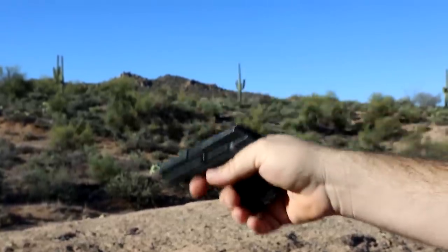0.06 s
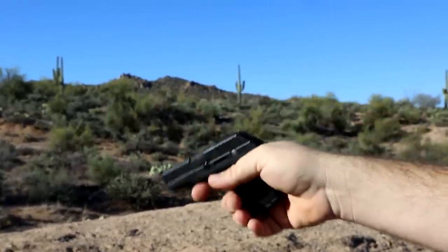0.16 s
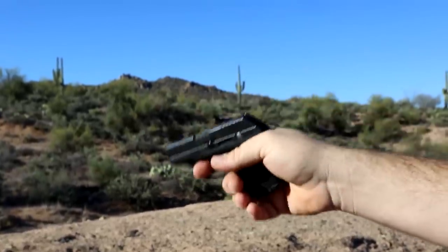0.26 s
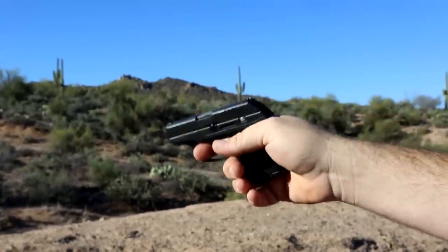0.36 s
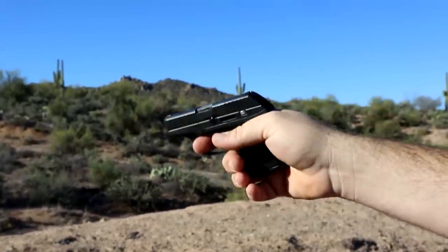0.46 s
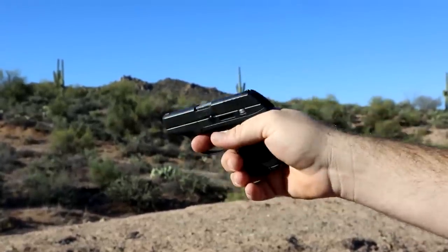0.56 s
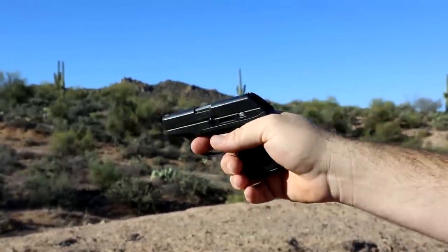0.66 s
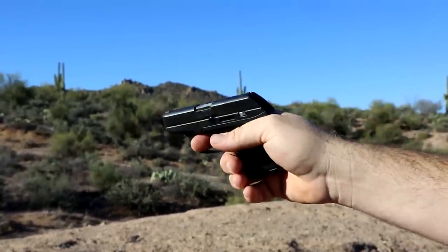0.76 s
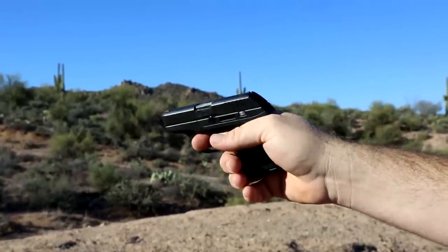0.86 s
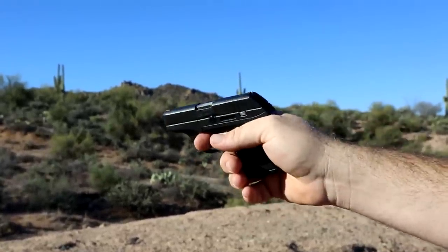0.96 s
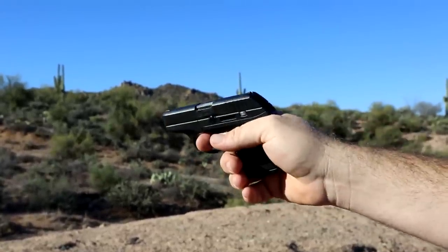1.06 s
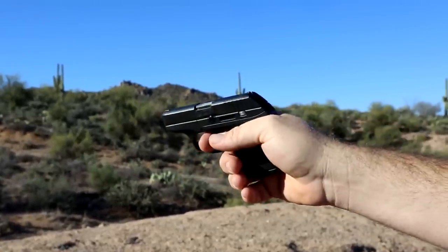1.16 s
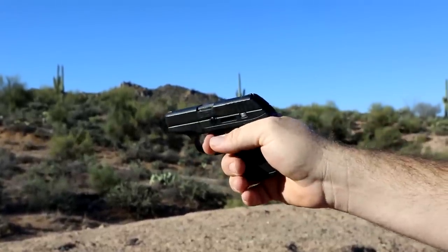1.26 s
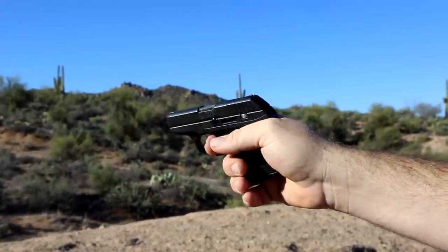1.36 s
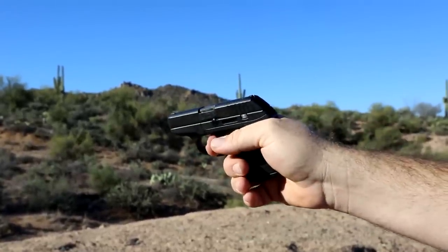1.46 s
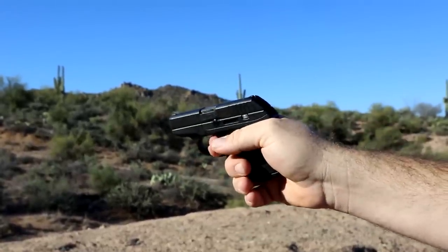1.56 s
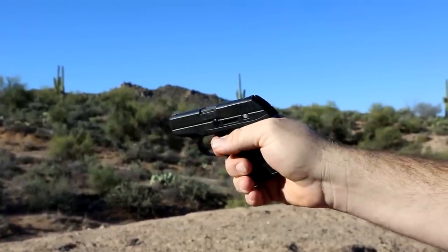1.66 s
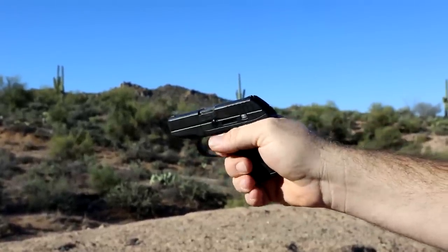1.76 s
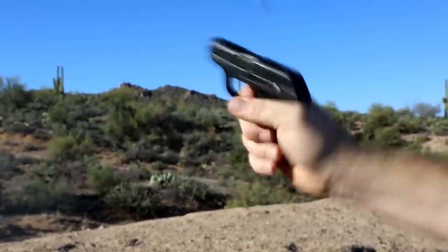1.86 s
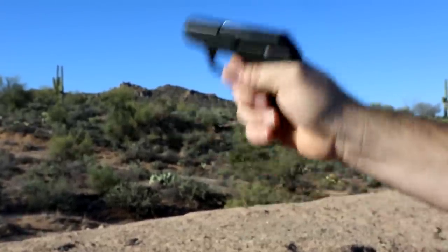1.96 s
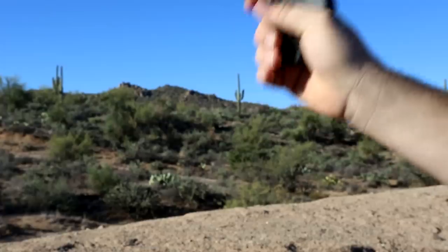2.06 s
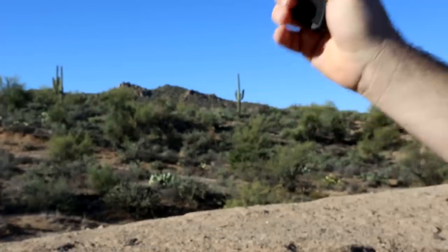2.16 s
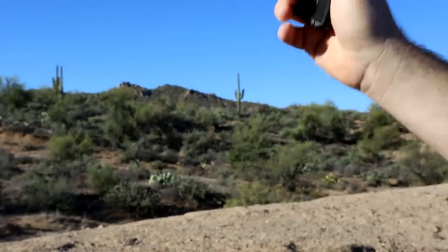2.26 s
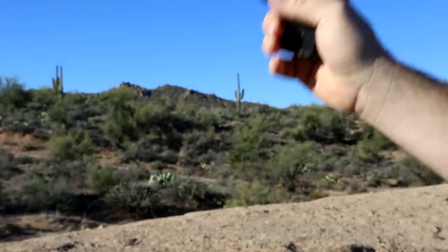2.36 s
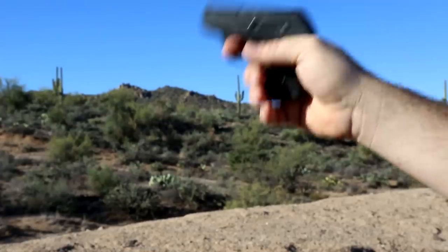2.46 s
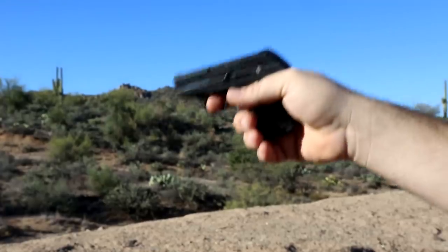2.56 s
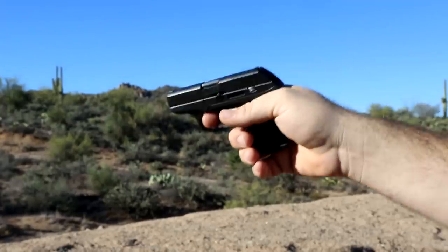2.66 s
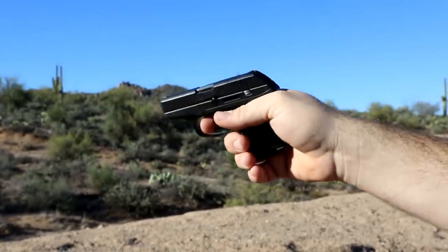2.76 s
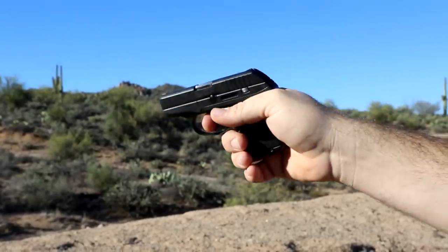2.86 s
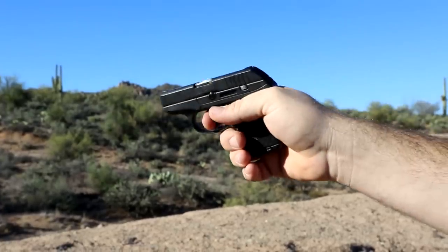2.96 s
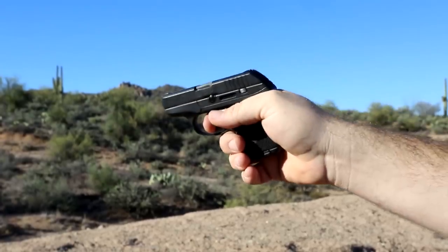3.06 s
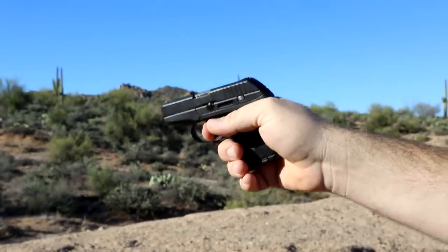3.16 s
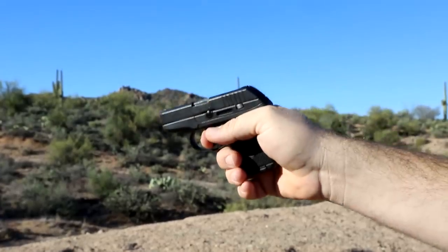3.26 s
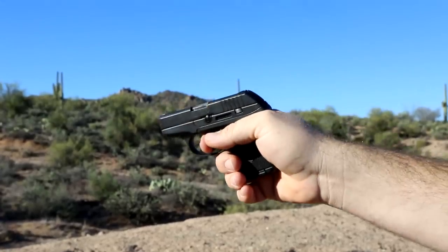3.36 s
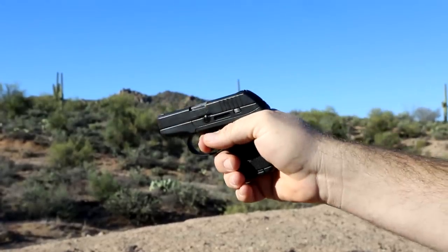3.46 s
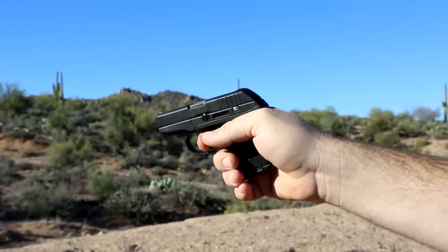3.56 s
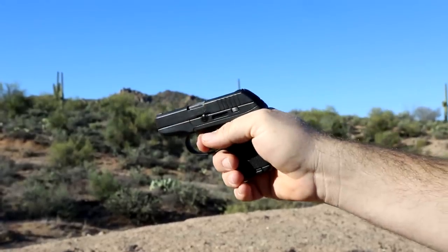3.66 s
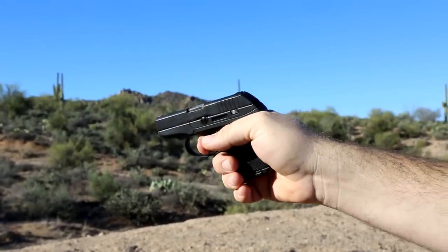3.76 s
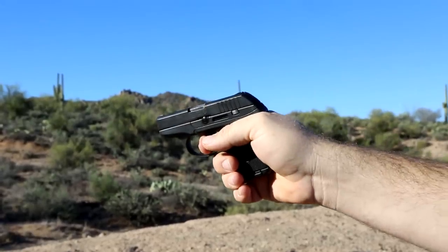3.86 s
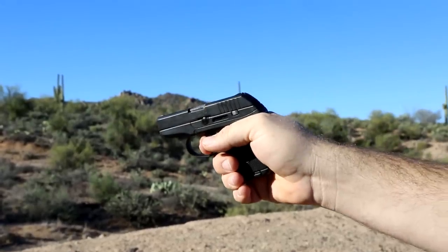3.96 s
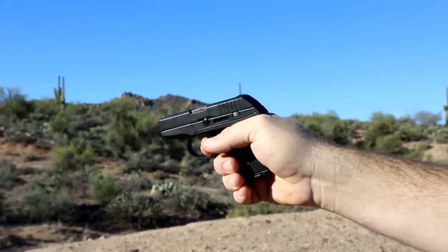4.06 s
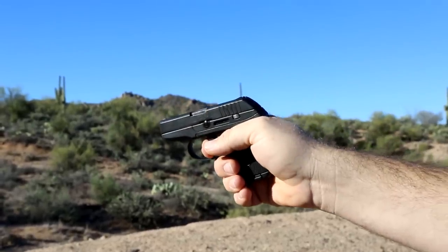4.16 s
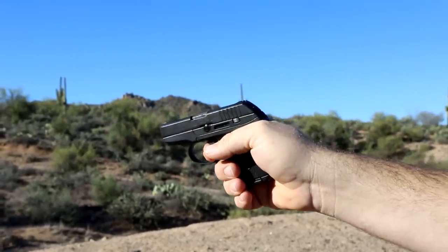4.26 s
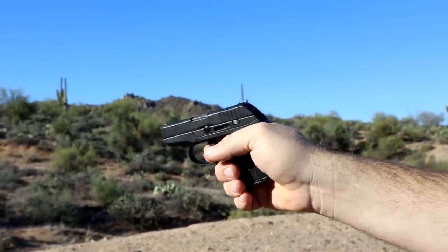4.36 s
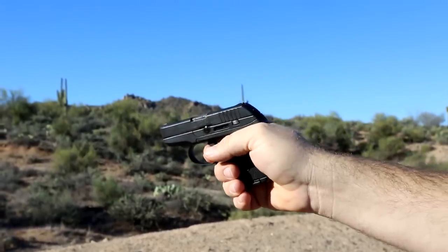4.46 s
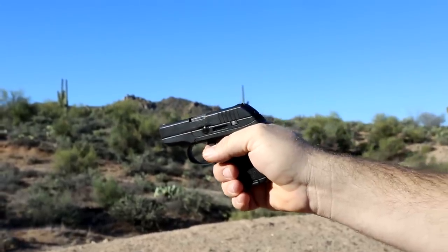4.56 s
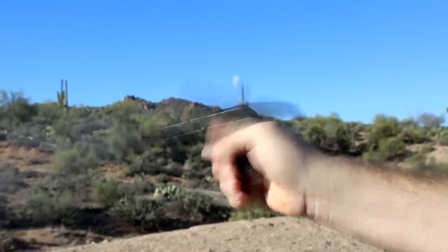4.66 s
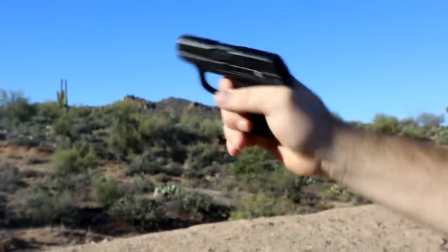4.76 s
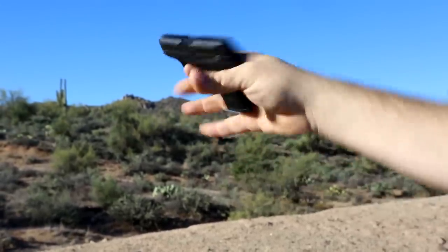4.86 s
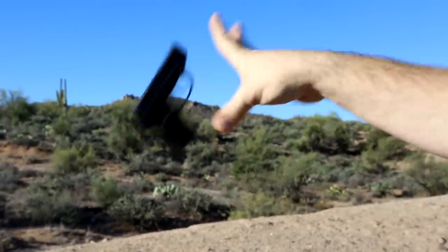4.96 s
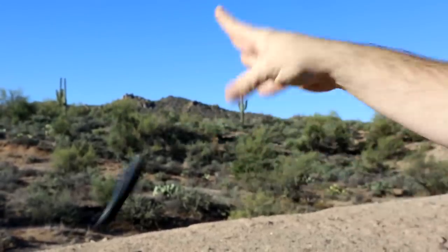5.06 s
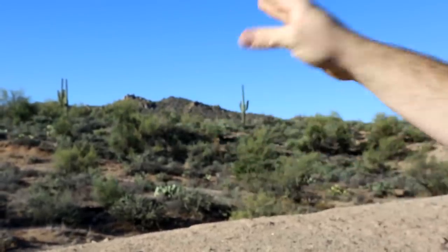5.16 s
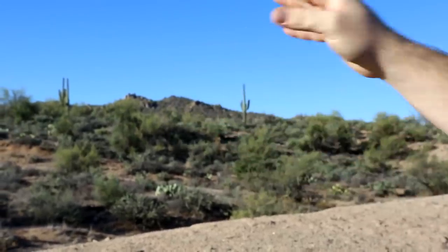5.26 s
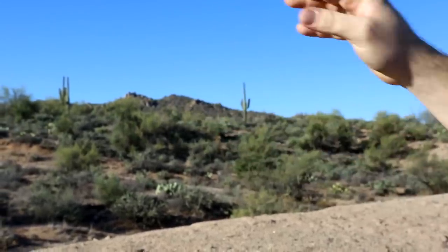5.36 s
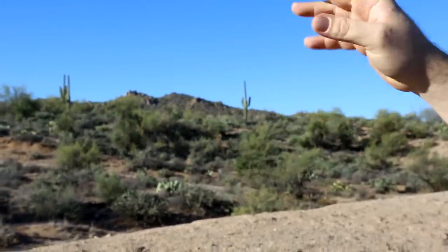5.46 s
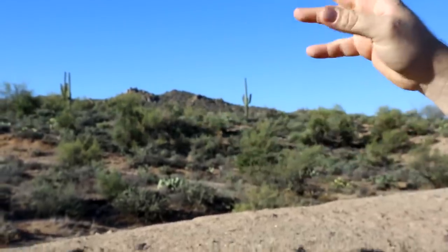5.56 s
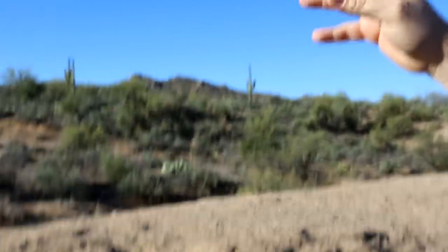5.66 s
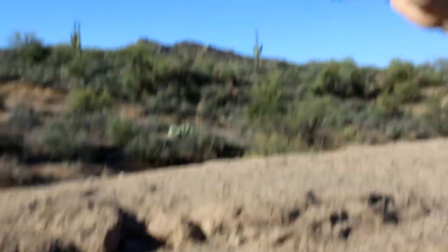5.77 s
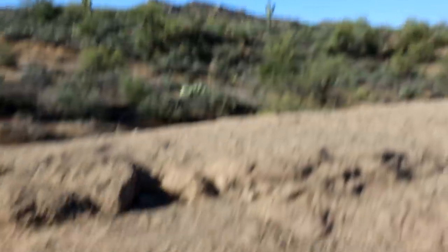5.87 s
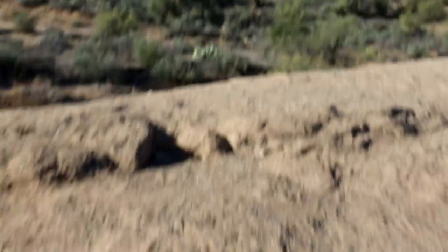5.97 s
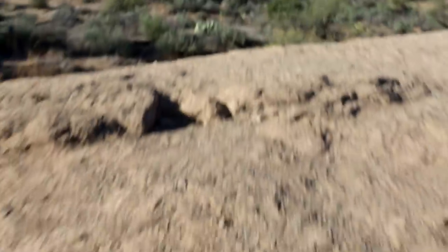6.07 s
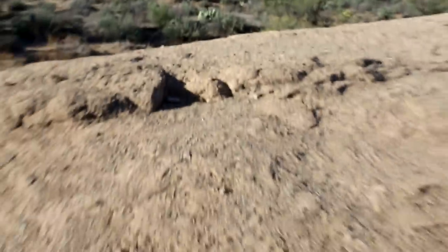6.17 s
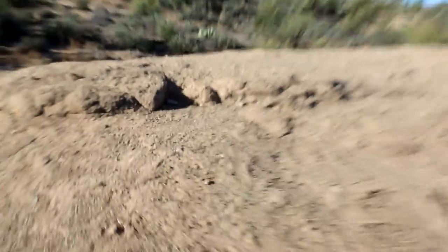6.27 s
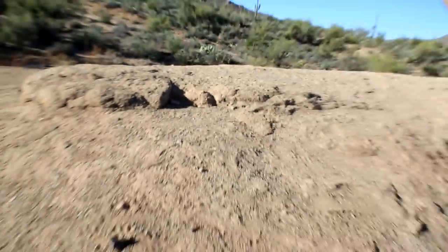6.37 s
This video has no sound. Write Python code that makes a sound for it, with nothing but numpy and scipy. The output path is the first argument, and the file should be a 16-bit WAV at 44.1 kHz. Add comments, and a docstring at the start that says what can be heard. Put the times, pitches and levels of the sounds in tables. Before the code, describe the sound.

The echo of an earlier shot fades over open desert. After a few faint grip clicks, a small pistol fires close to the microphone, a sharp, overloaded crack with a short echo off the rocks. A second shot follows about three seconds later. The pistol then hits stone with a hard metallic clack and a brief clatter, and a hand rubs and knocks the microphone. Faint wind lies underneath.

```python
"""A small pistol fires twice in open desert, close to a camera; an earlier shot's echo rolls at the start.
Each blast returns from the same brush and rock faces, duller the farther it has travelled.
The pistol is then dropped, strikes hard by the microphone and clatters; the hand rubs the camera as it
swings down. The camera overloads on each bang, ducks its gain and slowly lets the faint wind back in."""
import sys
import numpy as np
from scipy import signal
from scipy.fft import rfft, irfft, next_fast_len
from scipy.io import wavfile
from scipy.ndimage import uniform_filter1d, minimum_filter1d, map_coordinates

SR = 44100
rng = np.random.default_rng(int(sys.argv[2]) if len(sys.argv) > 2 else 0)


def master_out(mix):
    """Clip the mix to full scale and print it as 16-bit PCM to the path in sys.argv[1]."""
    frames = np.transpose(np.atleast_2d(mix))
    ceiling = np.clip(frames, -1, 1)
    pcm = np.round(ceiling * 32767).astype(np.int16)
    wavfile.write(sys.argv[1], SR, pcm)


N = 283298
TIME = np.arange(N) / SR
NEAR_ATTACK_S, NEAR_END_S = 0.002, 0.027  # answer of the nearest ground and boulders

# trigger pulls: t/s, level/dB
SHOTS = [(-.335, -0.2), (1.9688, 0.5), (4.8120, 0.5)]
# spectrum of small clicks: f/Hz, level/dB
CLICK_SPECTRUM = [(500, 6), (2000, -7.5), (5500, 0), (11000, -1), (15500, -7.5)]


def gunshots():
    """Each shot has its own crack; the land answers all alike."""
    out, answer = np.zeros(N), boom() + land_echo()
    for s, db in SHOTS:
        add(out, s, amp(db) * (crack() + answer))
    return out


def crack(spray_db=4.5):
    """Muzzle blast, its ground bounce and a bright spray off the nearest stones."""
    # blast and bounce: delay/s, length/s, level/dB
    pulses = [(.0004, .0008, 19), (.0023, 0.0021, 26)]
    # crack spectrum: f/Hz, level/dB
    spectrum = [(100, -18.5), (700, -4), (2000, -5), (4000, -4), (6000, -5), (7500, -5), (10500, -5),
                (15500, -9)]
    blast = sum(amp(db) * swell(TIME, s, s + length, attack_s=0.0004, fall_db_per_s=13000)
                for s, length, db in pulses)
    spray = swell(TIME, NEAR_ATTACK_S, NEAR_END_S, NEAR_ATTACK_S, fall_db_per_s=1000, sag_db_per_s=201)
    return np.hypot(blast, amp(spray_db) * spray) * noise(lambda hz: colour(spectrum, hz))


def boom(gain_db=12.5, wash_db=-3.5, ring_db=15.5, struck_s=0.0035):
    """Low part of the blast, ringing briefly among the nearest rocks."""
    # resonances: f/Hz, level/dB
    modes = [(545, -31), (900, -30), (1208, -30), (1357, -30.5), (1655, -30.5), (2285, -39), (2404, -42.5),
             (2626, -37.5), (2832, -37.5), (3219, -40)]
    # wash spectrum: f/Hz, level/dB
    spectrum = [(40, -24), (110, -8.5), (330, -0.5), (450, -3.5), (800, -4.5), (1200, 1), (2000, -6),
                (2800, -6.5), (4500, -13.5), (9000, -26), (16000, -42)]
    t = TIME[:SR // 4]
    ring = sum(amp(db) * np.sqrt(2) * np.sin(2 * np.pi * hz * (t - struck_s)) for hz, db in modes)
    wash = noise(lambda hz: colour(spectrum, hz))[:len(t)]
    shape = swell(t, NEAR_ATTACK_S, NEAR_END_S, NEAR_ATTACK_S, fall_db_per_s=850.5, sag_db_per_s=310)
    sound = amp(gain_db) * shape * (amp(wash_db) * wash + amp(ring_db) * ring)
    return np.pad(sound, (0, N - len(t)))


def land_echo(clump_db=1.27, patchy_db=2.0, face_width=0.82):
    """Clumped scatter from brush, distinct slaps from rock faces."""
    # echo spectrum before air loss: f/Hz, level/dB
    spectrum = [(40, -50), (100, -23.5), (200, -11.5), (380, -7.5), (620, -1), (850, 2.5), (1150, 0),
                (1650, -9), (2200, -2), (2900, -10), (5000, -12.5), (10000, -17.5), (15500, -19)]
    # rock faces: delay/s, level/dB, spread/s, favoured f/Hz
    faces = [(.072, -10, 0.0098, 900), (.273, -14, 0.0051, 1720), (.519, -18, 0.0072, 590),
             (0.549, -14.5, 0.0068, 660), (0.6382, -14.5, 0.007, 590), (0.723, -30, 0.0058, 1260),
             (0.7924, -18.5, 0.0055, 1470), (.903, -35, 0.041, 980), (1.06, -29, 0.012, 890)]
    scatter = noise(lambda hz: colour(spectrum, hz)) * flutter(clump_db, rate_hz=120)
    bins_hz, delay_s, cells = signal.stft(scatter, SR, nperseg=256)
    # each bush and stone favours its own band
    patches = uniform_filter1d(rng.standard_normal(cells.shape), size=4, axis=0)
    patches = unit(uniform_filter1d(patches, size=3, axis=1))
    cells = cells * unit(amp(patchy_db * patches)) * air_loss(bins_hz[:, None], delay_s)
    echo = signal.istft(cells, SR, nperseg=256)[1][:N] * brush_slopes()
    for s, db, spread_s, pitch_hz in faces:
        # a face's size limits the bass, its roughness the treble
        slap = lambda hz: colour(spectrum, hz) * air_loss(hz, s) * band_pass(hz, pitch_hz, face_width)
        add(echo, s, amp(db) * burst(slap, 4 * spread_s))
    return echo


def brush_slopes(attack_share=0.15):
    """Scatter gain by delay; stretches of land add in power."""
    # brushy land: near delay/s, far delay/s, level/dB, fall/(dB/s)
    stretches = [(0.047, .046, -12.5, 290), (0.114, .172, -15.5, 169), (0.274, 0.546, -24, 66.5),
                 (0.873, 1.36, -47, 54.5)]
    return np.sqrt(sum((amp(db) * swell(TIME, near, far, attack_share * near, fall)) ** 2
                       for near, far, db, fall in stretches))


def air_loss(hz, delay_s, db_per_s_at_1khz=2.0):
    """Dry air absorbs treble in proportion to the path."""
    return amp(-db_per_s_at_1khz * delay_s * (hz / 1000) ** 1.52)


def dropped_pistol(clink_db=-19, rattle_db=-22.5, edge_gap_share=0.2):
    """Steel bounces on stone: per landing two clacks, a clink, a rattle of loose parts and a thud."""
    # landings: t/s, level/dB, t60/s, relative thud/dB
    landings = [(5.606, 14.5, .015, -13), (5.6233, 2, .02, -34), (5.716, -32, 0.0085, -16),
                (5.774, -23.5, 0.031, -4), (5.798, -25, 0.0082, -23), (5.8287, -17, 0.036, -4),
                (5.9222, -31.5, 0.021, 1), (5.973, -32, 0.021, -10)]
    # clack spectrum: f/Hz, level/dB
    clack_spectrum = [(100, -23), (600, -16), (1100, -6), (2000, -7.5), (3100, -2.5), (3800, -10),
                      (5600, 1.5), (7500, -3), (10000, 0.5), (12700, -3.5), (15700, -6.5)]
    # steel modes: f/Hz, level/dB, t60/s
    modes = [(3180, -4, 0.059), (5300, -8, .054), (6070, -23, .2), (10780, -21, .08), (12950, -17, .076)]
    # thud spectrum: f/Hz, level/dB
    thud_spectrum = [(40, -30), (220, -1.5), (450, -8.5), (1500, -15), (8000, -38)]
    out, t = np.zeros(N), TIME[:8192]
    clack = lambda t60_s: burst(lambda hz: colour(clack_spectrum, hz), t60_s)
    for s, db, t60_s, thud_db in landings:
        clink = sum(amp(mode_db - 60 * t / ring_s) * np.sin(2 * np.pi * (hz * t + rng.random()))
                    for hz, mode_db, ring_s in modes)
        thud = amp(thud_db) * burst(lambda hz: colour(thud_spectrum, hz), t60_s=0.019)
        first_edge = clack(t60_s)
        rattle = amp(rattle_db) * clack(t60_s=0.14)
        add(out, s, amp(db) * (first_edge + amp(clink_db) * clink + rattle + thud))
        # second edge: later on a softer landing
        add(out, s + edge_gap_share * t60_s, amp(db - 1) * clack(t60_s))
    return out


def handling(click_trim_db=-2.0):
    """Small impacts of hands, feet, pistol and camera."""
    # clicks of grip, trigger and camera: t/s, level/dB
    clicks = [(.5921, -34), (0.7143, -34.5), (0.8767, -31.5), (1.1994, -37), (1.588, -39.5), (1.7671, -37),
              (3.009, -38.5), (3.1455, -32), (4.1585, -37.5), (6.1168, -20), (6.205, -27)]
    # dull bumps of hands and feet: t/s, level/dB, low-pass f/Hz, t60/s
    bumps = [(.8779, -28.5, 1420, 0.017), (1.228, -24.5, 564, 0.057), (3.009, -30, 800, 0.033),
             (3.144, -26.5, 1100, 0.034), (3.8637, -28, 1360, 0.019), (4.158, -26.5, 990, 0.017),
             (6.1174, -20, 1330, 0.02), (6.346, -29.5, 330, 0.06)]
    # hard taps on pistol and camera: t/s, level/dB, f/Hz, t60/s
    knocks = [(2.1797, -19, 9240, 0.0092), (2.2087, -16.5, 10900, 0.0092), (4.99, -17, 10000, .01),
              (5.003, -20, 10700, .01), (6.2604, -15.5, 1860, 0.012), (6.279, -25, 1480, 0.023)]
    # pings of a steel spring: t/s, level/dB, f/Hz, t60/s
    pings = [(3.145, -66, 12000, .5), (3.64, -61.5, 12000, 0.33), (6.1175, -48.5, 11770, 0.82)]
    bump_spectrum = [(40, -7), (130, -3.5), (350, -1.0), (900, -9.5)]  # f/Hz, level/dB
    out = np.zeros(N)
    for s, db in clicks:
        add(out, s, amp(db + click_trim_db) * burst(lambda hz: colour(CLICK_SPECTRUM, hz), t60_s=0.015))
    for s, db, corner_hz, t60_s in bumps:
        bump = burst(lambda hz: low_pass(hz, corner_hz) * colour(bump_spectrum, hz), t60_s)
        add(out, s, amp(db) * bump)
    for s, db, body_hz, t60_s in knocks:
        add(out, s, amp(db) * burst(lambda hz: band_pass(hz, body_hz, width=0.5), t60_s))
    for s, db, ring_hz, t60_s in pings:
        add(out, s, amp(db) * burst(lambda hz: 1 / (1 + ((hz - ring_hz) / 90) ** 2), t60_s, size=16384))
    return out


def rubbing(hold_s=5.76, hold_db=-43.5, swing_s=6.39, swing_db=-36):
    """Grainy friction of hand on camera after the drop, harder on the downward swing."""
    # friction spectrum: f/Hz, level/dB
    spectrum = [(35, -48), (60, -9), (163, -7), (226, -2.5), (344, -10.5), (396, -10.5), (1050, -10),
                (2170, -14.5), (10100, -23), (15700, -30)]
    hold = amp(hold_db) * rise(TIME, hold_s, attack_s=0.11)
    swing = amp(swing_db) * rise(TIME, swing_s, attack_s=0.097)
    friction = noise(lambda hz: colour(spectrum, hz)) * flutter(depth_db=2.5, rate_hz=400)
    return np.hypot(hold, swing) * friction


def grit(ticks_per_s=36, spread_db=4):
    """Faint ticks of skin and sand, soft to sharp, louder when the hand shifts."""
    # hand effort on grip and camera: t/s, level/dB
    effort = [(0, -51.5), (.8, -49.5), (2, -54.5), (4.7, -59.5), (5.6, -51), (6.42, -49)]
    out = np.zeros(N)
    for when, size, sharpness in rng.random((int(ticks_per_s * N / SR), 3)):
        s, corner_hz = when * N / SR, 7000 + 8000 * sharpness
        tick = burst(lambda hz: colour(CLICK_SPECTRUM, hz) * low_pass(hz, corner_hz), 0.0082, size=2048)
        effort_db = np.interp(s, *np.transpose(effort), left=-150, right=-150)
        add(out, s, amp(effort_db + spread_db * (2 * size + 0.5)) * tick)
    return out


def wind(rush_db=-45.5, buffet_db=-57):
    """Faint, far rush of air and steady hiss, with light buffeting."""
    # air spectra: f/Hz, level/dB
    rush_spectrum = [(15, -41), (25, -25), (99, -1.5), (290, -12.5), (360, -11), (485, -10.5), (707, -6),
                     (853, -9), (1500, -26), (2190, -30), (3460, -32), (6800, -33), (7990, -35),
                     (12300, -35), (15700, -42.5)]
    buffet_spectrum = [(20, -12), (60, -6.5), (110, 3.5), (250, -10), (700, -45), (2000, -88)]
    rush = noise(lambda hz: colour(rush_spectrum, hz))
    buffet = noise(lambda hz: colour(buffet_spectrum, hz)) * flutter(depth_db=4, rate_hz=10)
    return amp(rush_db) * rush + amp(buffet_db) * buffet


def amp(db):
    return 10 ** (np.asarray(db) / 20)


def unit(x):
    return x / np.sqrt(np.mean(x ** 2) + 1e-20)


def colour(points, hz):
    """Gain through (f/Hz, level/dB) points on a log axis."""
    f, db = np.transpose(points)
    return amp(np.interp(np.log(hz + 1), np.log(f), db))


def low_pass(hz, corner_hz):
    """Second-order low-pass gain."""
    return 1 / np.sqrt(1 + (hz / corner_hz) ** 4)


def band_pass(hz, centre_hz, width):
    """Gain of one resonance; width is a share of its centre."""
    return (hz + 40) / np.hypot(hz, (hz ** 2 - centre_hz ** 2) / (width * centre_hz))


def noise(gain):
    """Noise of rms 1, shaped by gain(hz)."""
    m = next_fast_len(N)
    return unit(irfft(rfft(rng.standard_normal(m)) * gain(np.fft.rfftfreq(m, 1 / SR)), m)[:N])


def flutter(depth_db, rate_hz):
    """Smooth random gain of rms 1."""
    knots = rng.standard_normal(int(N * rate_hz / SR) + 4)
    return unit(amp(depth_db * map_coordinates(knots, [TIME * rate_hz])))


def burst(gain, t60_s, size=8192):
    """Decaying coloured noise, starting near rms 1."""
    decay = amp(-60 * np.arange(size) / SR / t60_s)
    response = minimum_phase(gain(np.fft.rfftfreq(size, 1 / SR)))
    puff = irfft(rfft(rng.standard_normal(size) * decay) * response)
    return puff * np.linalg.norm(decay) / np.linalg.norm(puff)


def minimum_phase(gain):
    """Causal response with this gain: nothing sounds before the blow."""
    cepstrum = irfft(np.log(np.maximum(gain, 1e-6)))
    half = len(cepstrum) // 2
    cepstrum[1:half] *= 2
    cepstrum[half + 1:] = 0
    return np.exp(rfft(cepstrum))


def rise(t, full_s, attack_s):
    """Linear ramp reaching 1 at full_s."""
    return np.clip(1 + (t - full_s) / attack_s, 0, 1)


def swell(t, full_s, end_s, attack_s, fall_db_per_s, sag_db_per_s=0):
    """Gain that rises until full_s, sags until end_s, then dies away."""
    sag_db = sag_db_per_s * np.clip(t - full_s, 0, abs(end_s - full_s))
    fall_db = fall_db_per_s * np.maximum(t - end_s, 0)
    return rise(t, full_s, attack_s) * amp(-sag_db - fall_db)


def add(track, s, sound):
    """Mix a sound in at time s, which may be negative."""
    start = round(s * SR)
    part = sound[max(-start, 0):max(N - start, 0)]
    track[max(start, 0):][:len(part)] += part


def scene():
    return (gunshots() + dropped_pistol() + handling() + rubbing() + grit() + wind())[None]


def gain_control(x, limit_db=-6, depth_db=-20, hold_s=0.021, release_db_per_s=29):
    """A bang ducks the gain at once; it holds briefly, then climbs evenly in dB."""
    level_db = 10 * np.log10(np.abs(uniform_filter1d(x ** 2, size=32)) + 1e-12)
    needed_db = np.clip(limit_db - level_db, depth_db, 0)
    half = int(hold_s * SR / 2)
    held_db = minimum_filter1d(needed_db, 2 * half + 1, origin=half)
    # still recovering from the shot before t = 0
    held_db[0] = min(depth_db - release_db_per_s * (SHOTS[0][0] + hold_s), 0)
    climb_db = release_db_per_s * TIME
    return amp(np.minimum.accumulate(held_db - climb_db) + climb_db)


def record(dry, ceiling=0.85, hardness=6, low_cut_hz=20, high_cut_hz=15850):
    """The camera's gain control, overload and band limits."""
    ducked = dry * gain_control(dry[0])
    saturated = ducked / (1 + np.abs(ducked / ceiling) ** hardness) ** (1 / hardness)
    m = next_fast_len(N + SR // 2)
    hz = np.fft.rfftfreq(m, 1 / SR)
    high_cut = 1 / (1 + (hz / high_cut_hz) ** 200)
    low_cut = (1j * hz / (low_cut_hz + 1j * hz)) ** 2
    return irfft(rfft(saturated, m) * low_cut * high_cut, m)[:, :N]


dry = scene()
out = record(dry)
master_out(out)
```